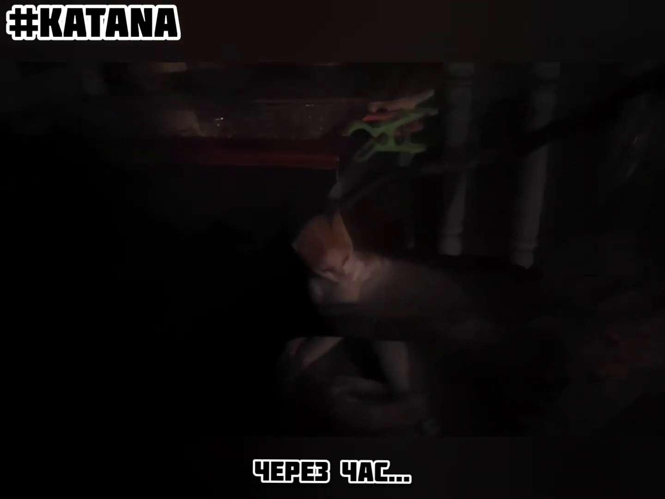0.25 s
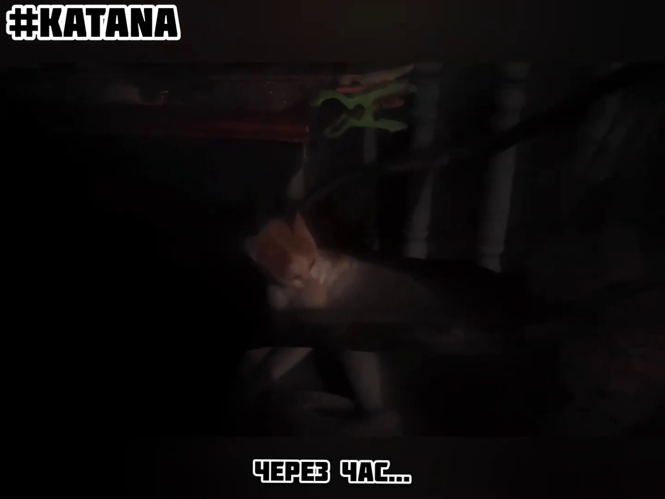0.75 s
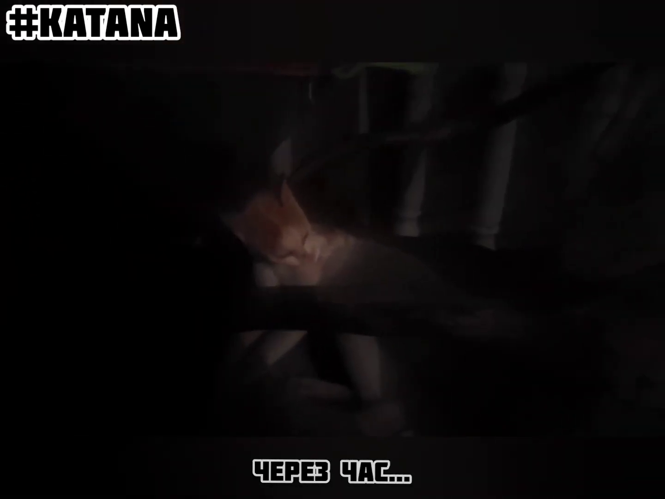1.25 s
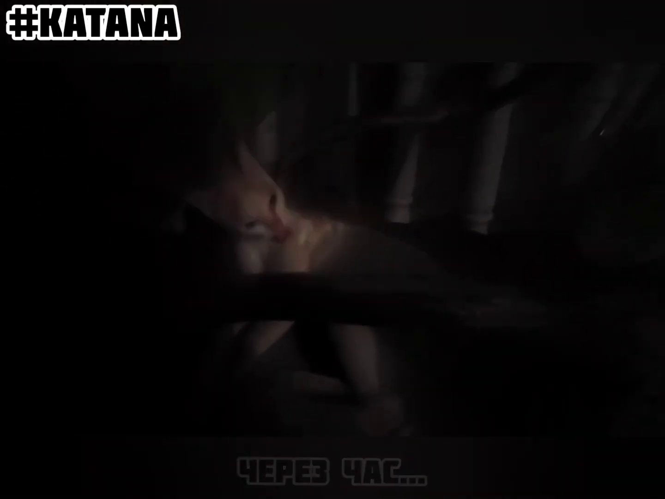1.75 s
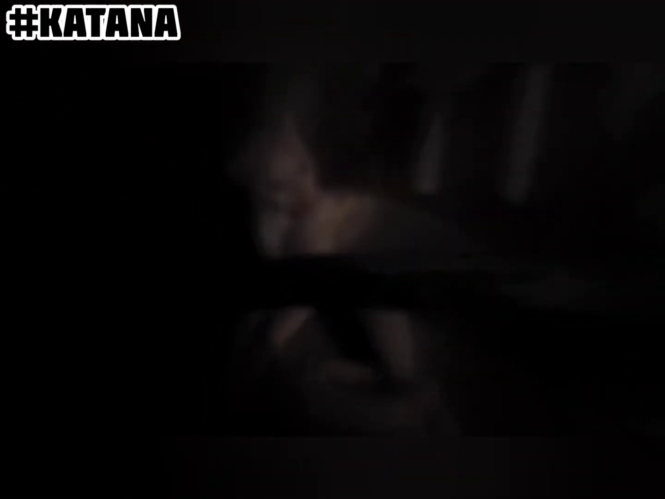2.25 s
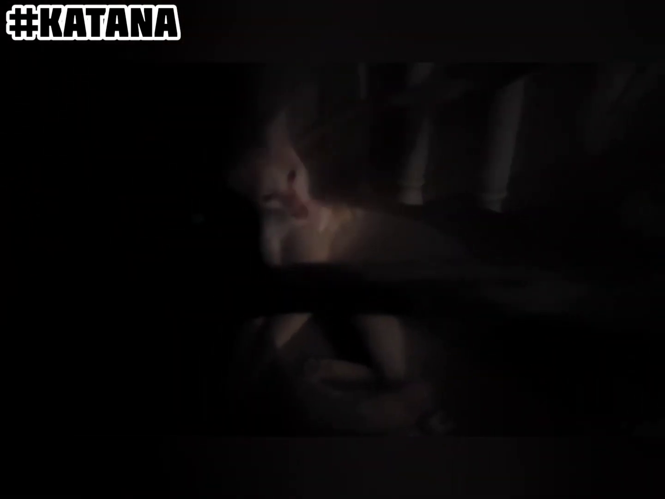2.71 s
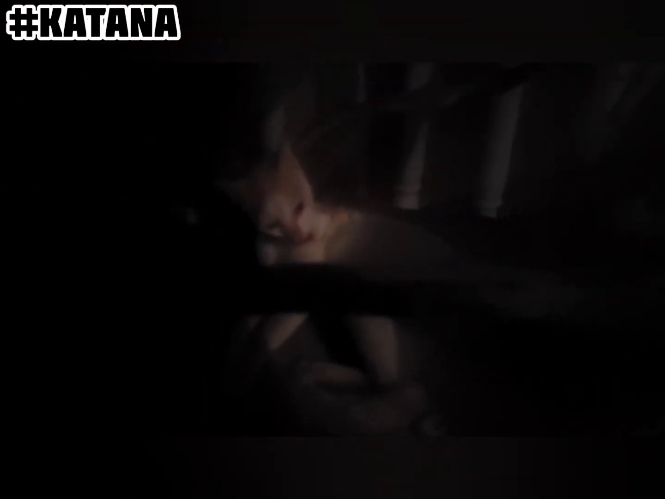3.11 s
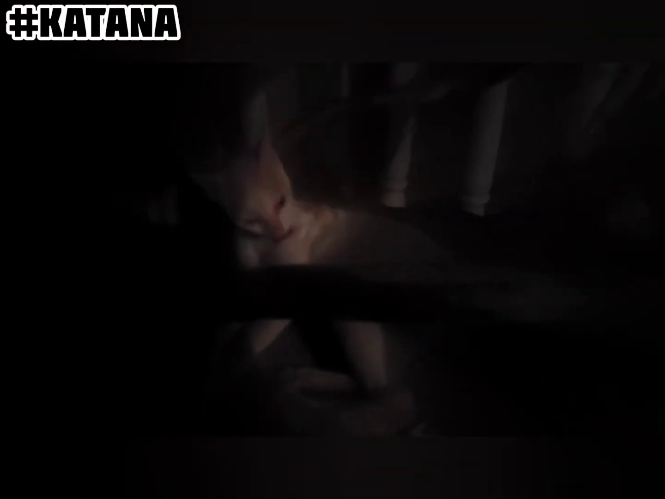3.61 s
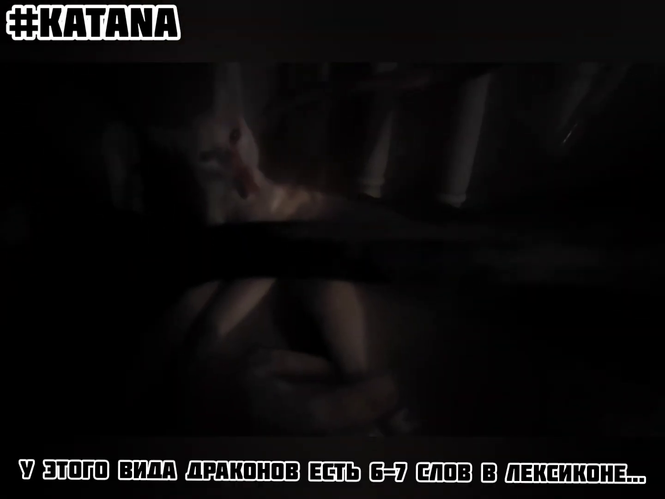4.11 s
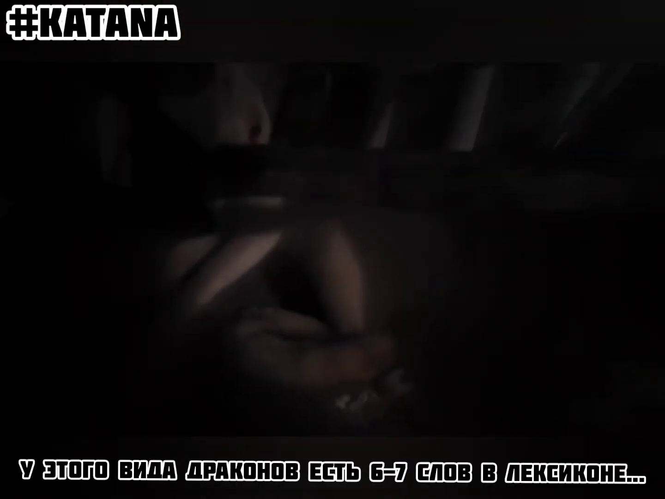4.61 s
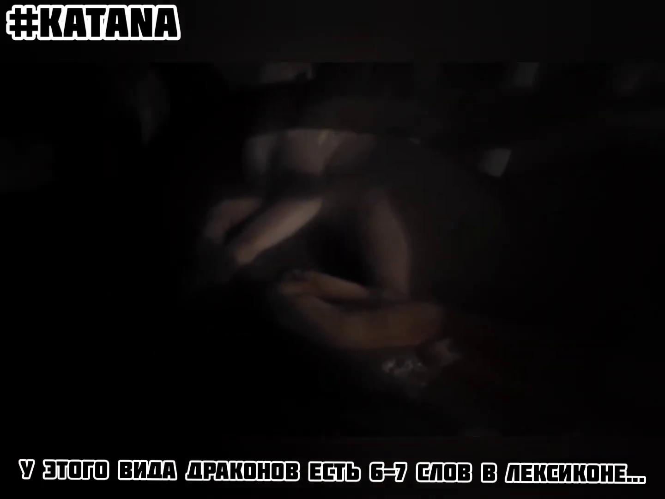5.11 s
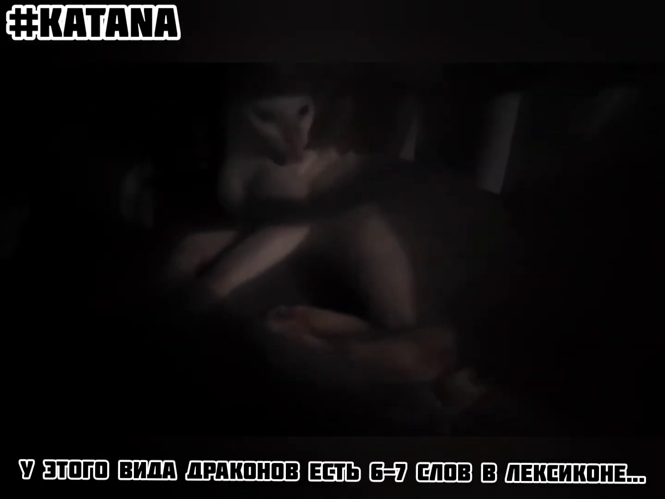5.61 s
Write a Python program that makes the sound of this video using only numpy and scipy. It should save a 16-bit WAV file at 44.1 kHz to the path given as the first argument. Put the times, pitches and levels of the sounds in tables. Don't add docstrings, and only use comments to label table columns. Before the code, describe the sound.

A continuous summer night chorus lasts about six seconds, with no clear beginning or end. Far crickets and katydids blend into shrill, shimmering bands, different in each ear, swelling in waves roughly every half second. Beneath lie quieter, lower insect bands and a soft rumble of air and distant traffic. A tiny scuff opens the scene. A near cricket trills in seven-stroke phrases at about 0.15, 1.2, 2.5, 3.6 and 4.9 seconds; the fourth is weakest, the last loudest and slightly right. Two katydids on the left alternate dry, hissing rasps throughout, and a shy cricket swells softly there near 0.7, 2.6, 4.2 and 5 seconds. At 4.14 seconds a very short, hard tap hits the right microphone, bright and clipped with a tiny thud. Faint brushes follow around 5 seconds, and the highest haze flares left near 5.35. The recording is open, dry and slightly grainy.

```python
import sys
import numpy as np
from scipy import signal
from scipy.io import wavfile
from scipy.ndimage import uniform_filter1d

SR = 44100
rng = np.random.default_rng(int(sys.argv[2]) if len(sys.argv) > 2 else 0)


def attenuation_scalar(level_db):
    decades = np.asarray(level_db, float) / 20
    return 10 ** decades


def int16_out(signal):
    q = np.round(np.clip(np.atleast_2d(signal).T, -1, 1) * 32767)
    wavfile.write(sys.argv[1], SR, q.astype(np.int16))


N = 258205


def rms_one(x):
    return x / np.sqrt(np.mean(x ** 2, axis=-1, keepdims=True) + 1e-20)


def at_hz(points, hz):
    points_hz, values = np.transpose(points)
    return np.interp(np.log(hz), np.log(points_hz), values)


def drift(rate_hz):
    r = np.exp(-80 * np.pi * rate_hz / SR)
    slow = signal.lfilter([1], [1, -2 * r, r * r], rng.standard_normal(N // 40 + 2002))[2000:]
    return np.interp(np.arange(N) / 40, np.arange(len(slow)), rms_one(slow))


def swells(events):
    t = np.arange(N) / SR
    return sum(attenuation_scalar(level_db) * np.exp(-((t - middle) / length) ** 2) for middle, length, level_db in events)


def resonance(x, hz, width_hz):
    r = np.exp(-np.pi * width_hz / SR)
    section = [(1 - r * r) / 2, 0, (r * r - 1) / 2, 1, -2 * r * np.cos(2 * np.pi * hz / SR), r * r]
    return signal.sosfilt([section, section], x)


def singers(wings, strikes_per_s, flutter_db):
    out = 0
    for hz, width_hz, level_db in wings:
        strikes = (rng.random(N) < strikes_per_s / SR) * rng.standard_normal(N)
        flutter = attenuation_scalar(level_db + flutter_db * drift(18.6))
        out = out + flutter * resonance(strikes, hz, width_hz)
    return rms_one(out)


def both_sides(wings, alike, **how):
    shared, apart = singers(wings, **how), singers(wings, **how)
    return (np.sqrt(1 + alike) * shared + np.sqrt(1 - alike) * apart * [[1], [-1]]) / np.sqrt(2)


def loudness(chorus):
    # crest_s, left_rise_db, right_rise_db
    wave_crests = [(.42, 5, 4.5), (1.08, 2.3, 1), (1.4, 1.2, 1.1), (2.1, 5, 5), (2.84, 4.5, 6),
                   (3.4, 3.5, 2), (3.72, 0.5, 3.5), (4.44, 5, 4.5), (4.85, 1.3, 2), (5.33, 6, 3.5),
                   (5.88, 6.5, 2)]
    # time_s, left_db, right_db
    facing = [(0, 1, -1), (1, 0.8, 0.2), (2, -0.2, 0), (3, 0.1, -0.5), (4.05, -0.5, 0.45), (4.3, 0.3, 1.5),
              (4.9, -0.6, 1.7), (5.4, 0.5, .6), (5.85, 1.5, 1)]
    choruses = {"lower": [(-42.5, 1.2, 0.22), (-28.5, 0.43, 0.35)], "upper": [(-34.5, .95, 0.44),
                (-32, 1.19, 0.52)], "deep": [(-32.5, 0.02, 2.1), (-35.5, 0.054, 0.5)],
                "middle": [(-42, .05, -.2), (-42, .05, 0.93)], "thin": [(-49, -.1, .1), (-46, -0.024, 1.8)],
                "haze": [(-58, -0.063, -0.094), (-58.5, -0.7, 0.23)], "edge": [(-43, 0.038, .2),
                (-46.5, .05, 0.22)]}
    t = np.arange(0, N + 64, 64) / SR
    waves = 0
    for crest, left_db, right_db in wave_crests:
        span_s = np.where(t < crest, .2, .24)
        waves = waves + np.outer([left_db, right_db], np.exp(-((t - crest) / span_s) ** 2))
    s, *sides = np.transpose(facing)
    facing_db = np.array([np.interp(t, s, side) for side in sides])
    level_db, by_waves, by_facing = np.transpose(choruses[chorus])[:, :, None]
    gain = attenuation_scalar(level_db + by_waves * waves + by_facing * facing_db)
    return np.repeat(gain, 64, axis=1)[:, :N]


def night_air():
    # pitch_hz, level_db (per Hz)
    air_spectrum = [(13, -31), (22, 3), (65, -7.5), (96, -3.5), (130, -8.5), (167, 2), (226, -2.5),
                    (424, -6), (517, -7.5), (618, -13), (986, -13.5), (1340, -22), (1600, -30.5),
                    (2080, -60), (3520, -120)]
    # pitch_hz, likeness (1 = same)
    ear_likeness = [(60, 0.44), (120, 0.74), (250, 0.8), (500, 0.59), (1030, 0.066), (2090, 0.33),
                    (4250, 0), (8640, -0.0)]
    out = 0
    edges = 20 * 2 ** np.arange(0, 8.1, .5)
    white = rng.standard_normal((2, 2, N))
    for k, (low, high) in enumerate(zip(edges, edges[1:])):
        band = signal.butter(2, [low, high], "band", fs=SR, output="sos")
        mid, side = signal.sosfilt(band, white[k % 2])
        hz = np.sqrt(low * high)
        alike = np.clip(at_hz(ear_likeness, hz), -1, 1)
        steeper_db = -14 * max(np.log2(hz / 1600), 0)
        gain = attenuation_scalar(at_hz(air_spectrum[1:-1], hz) + steeper_db + 2.1 * drift(7.2))
        out = out + gain * (np.sqrt(1 + alike) * mid + np.sqrt(1 - alike) * side * [[1], [-1]])
    return attenuation_scalar(-39.96) * rms_one(out) * attenuation_scalar(np.array([[1.4], [-1.4]]))


def rustles():
    # middle_s, length_s, level_db
    stirrings = [
        (0.02, 0.015, -37.5),
        (2.623, 0.22, -60.5),
        (4.234, 0.041, -70.5),
        (4.897, 0.038, -59),
        (4.969, 0.032, -51.5),
        (5.208, .015, -54),
    ]
    dulled = signal.lfilter([1], [1, -.75], rng.standard_normal((2, N)))
    no_bass = signal.butter(2, 350, "high", fs=SR, output="sos")
    return swells(stirrings) * rms_one(signal.sosfilt(no_bass, dulled))


def steady_chorus():
    # pitch_hz, width_hz, level_db
    deep_wings = [(1939, 150, -3), (2072.5, 240, -2.5), (2440, 160, -23.5)]
    middle_wings = [(3698, 560, -4.5), (3976, 450, -2.5), (4233, 300, -7.5)]
    thin_wings = [(5393, 130, -11), (6030, 420, -2), (6310, 310, -6)]
    deep = loudness("deep") * both_sides(deep_wings, 0.24, strikes_per_s=6000, flutter_db=1.5)
    middle = loudness("middle") * both_sides(middle_wings, 0.13, strikes_per_s=7100, flutter_db=1.82)
    thin = loudness("thin") * both_sides(thin_wings, 0.011, strikes_per_s=13000, flutter_db=3.0)
    return deep + middle + thin


def shrill_chorus():
    # pitch_hz, width_hz, level_db
    lower_wings = [
        [(6900, 600, -8), (7430, 660, -6), (7680, 430, .5)],
        [(6960, 580, -5.5), (7376, 420, 3.5), (7572, 400, 1.5)],
    ]
    upper_wings = [
        [(7680, 420, -7), (7974, 360, 0), (8210, 300, -2.5)],
        [(7970, 450, 4), (8150, 350, -2.5)],
    ]
    # pitch_hz, width_hz, level_db
    edge_wings = [(8600, 330, -1.5), (9000, 360, -3.5)]
    lower = loudness("lower") * [singers(w, 9000, flutter_db=1.5) for w in lower_wings]
    upper = loudness("upper") * [singers(w, 9000, flutter_db=1.5) for w in upper_wings]
    period_s, crest_s, throb_db = .915, .68, 3
    throb = attenuation_scalar(throb_db * np.cos(2 * np.pi * (np.arange(N) / SR - crest_s) / period_s))
    edge = loudness("edge") * [singers(edge_wings, 9000, flutter_db=1.8) for ear in range(2)]
    return lower + upper + throb * edge


def shy_cricket():
    # middle_s, length_s, level_db
    songs = [
        (0.703, .14, -57.5),
        (2.606, 0.069, -49.5),
        (4.215, 0.11, -53),
        (4.99, 0.15, -52.5),
    ]
    # pitch_hz, width_hz, level_db
    shy_wings = [(4620, 400, -2.5), (4880, 400, -7.5)]
    return swells(songs) * singers(shy_wings, 6000, flutter_db=1.0) * attenuation_scalar(np.array([[1.5], [-2.5]]))


def katydids():
    # middle_s, length_s,
    # level_db
    near_rasp = [(.13, 0.18, -41), (.778, .13, -42.5), (1.465, 0.15, -45), (2.099, 0.15, -44),
                 (2.896, 0.18, -43.5), (3.55, .24, -43.5), (4.186, 0.15, -41), (4.844, 0.21, -41),
                 (5.677, 0.24, -41.5)]
    far_rasp = [(.275, .1, -49), (1.012, 0.093, -47), (1.842, 0.37, -51), (2.529, 0.16, -50.5),
                (3.26, 0.087, -51.5), (3.958, 0.099, -46.5), (4.68, 0.1, -44), (5.2, 0.061, -52),
                (5.434, 0.037, -44)]
    # pitch_hz, width_hz, level_db
    rasp_wings = [(9650, 420, 6), (10300, 1900, 0), (11680, 300, -5)]
    haze_wings = [(12290, 1100, 2.5), (13440, 1800, -8), (14360, 1500, -6.5)]
    t = np.arange(0, N + 64, 64) / SR
    at_ears = attenuation_scalar(np.array([[0], [-4.5]]))
    bursts = attenuation_scalar(-73.5)
    for middle, length, level_db in near_rasp + far_rasp:
        shape = np.exp(-np.abs((t - middle) / (0.46 * length)) ** 3)
        bursts = bursts + attenuation_scalar(level_db) * at_ears * shape
    bursts = np.repeat(bursts, 64, axis=1)[:, :N]
    rasp = bursts * both_sides(rasp_wings, 0.073, strikes_per_s=7400, flutter_db=4.5)
    crest_s, wide_s, rise_db = 5.35, 0.28, 6.5
    flare = attenuation_scalar(np.outer([rise_db, 0], np.exp(-((np.arange(N) / SR - crest_s) / wide_s) ** 2)))
    haze = both_sides(haze_wings, 0.067, strikes_per_s=2400, flutter_db=1.5)
    return rasp + flare * loudness("haze") * haze


def near_cricket():
    # first_stroke_s, peak_db, loudest_stroke, left_minus_right_db
    phrases = [
        (.152, -41.5, 1.1, 0.7),
        (1.195, -40, .7, 0.2),
        (2.511, -42.5, 0.69, 3),
        (3.628, -45, 0.17, -0.5),
        (4.885, -38, 1.1, -1.5),
    ]
    trill_hz, stroke_s, gap_s = 3132, 0.053, .063
    out = np.zeros((2, N))
    t = np.arange(round(stroke_s * SR)) / SR
    swell = np.sin(np.pi * (t / stroke_s) ** 1.7) ** 0.62
    chances = rng.standard_normal((len(phrases), 7, 4))
    for (first, peak_db, loudest, pan_db), chance in zip(phrases, chances):
        for k, (sag, detune, late, turn) in enumerate(chance):
            pitch_hz = trill_hz * (1 + .003 * detune + (.06 + .01 * sag) * np.exp(-t / 0.022))
            note = swell * np.sin(2 * np.pi * np.cumsum(pitch_hz) / SR)
            ears_db = np.array([[.5], [-.5]]) * (pan_db + 3.1 * turn)
            level_db = peak_db - (k - loudest) ** 2 + ears_db
            start = round((first + k * gap_s + .003 * late) * SR)
            out[:, start:start + len(t)] += attenuation_scalar(level_db) * note
    out = out * (1 + .38 * drift(90))
    fade = np.exp(-np.log(1000) * np.arange(SR // 3) / SR / 0.16)
    leaves = fade * rng.standard_normal((2, len(fade)))
    return out + attenuation_scalar(-22) * signal.fftconvolve(out, leaves, axes=1)[:, :N]


def tap():
    # start_s, level_db, pitch_hz, t60_s
    contacts = [
        (4.1347, -9, 7000, .006),
        (4.1351, -6, 6300, .005),
        (4.1362, 7, 6900, .004),
        (4.1369, 4.5, 2450, .004),
        (4.1374, 5, 7600, .003),
        (4.1382, -12, 7200, .003),
        (4.1400, -19, 900, .006),
    ]
    tap_s = 4.1370
    start = round((tap_s - .01) * SR)
    t = (start + np.arange(SR // 5)) / SR
    mesh = np.zeros(len(t))
    for s, level_db, hz, t60 in contacts:
        age = np.maximum(t - s, 0)
        onset = 1 - np.exp(-age / 0.00005)
        mesh += attenuation_scalar(level_db - 60 * age / t60) * np.sin(2 * np.pi * hz * age) * onset
    age = np.maximum(t - tap_s, 0)
    turns = 165 * age + 2.3 * (1 - np.exp(-age / .00112))
    swing = attenuation_scalar(4) * np.exp(-age / .0016) + attenuation_scalar(-14) * np.exp(-age / .012)
    membrane = -swing * np.sin(2 * np.pi * turns)
    body = attenuation_scalar(-20.0) * np.exp(-age / 0.0087) * np.sin(2 * np.pi * 75 * age)
    right = np.pad(mesh + membrane + body, (start, N - start - len(t)))
    return right * [[0], [1]]


def scene():
    background = night_air() + rustles() + steady_chorus() + shrill_chorus()
    return background + shy_cricket() + katydids() + near_cricket() + tap()


def coarse_grain(x, comb_db, patchy_db):
    # pitch_hz, usual_level_over_step_db
    coarseness = [(200, 18), (800, 5), (1200, -2), (1600, -3), (2050, 6), (2700, -9), (3000, -10),
                  (3350, -4), (3950, 1), (4600, -8), (5050, -14), (5600, -3), (6300, 4), (7800, 20),
                  (8800, -4), (9700, -16.5), (11200, -13), (12300, -9), (14200, -9), (15000, -11.5)]
    hop, lines = 1024, 704
    hz = (np.arange(lines) + .5) * SR / (2 * hop)
    basis = np.cos(np.pi / hop * np.outer(np.arange(2 * hop) + .5 + hop / 2, np.arange(lines) + .5))
    basis *= signal.windows.kaiser_bessel_derived(2 * hop, 4 * np.pi)[:, None] * np.sqrt(2 / hop)
    lead = 2 * hop - 291
    padded = np.pad(x, [(0, 0), (lead, 3 * hop)])
    index = np.arange(padded.shape[1] // hop - 1)[:, None] * hop + np.arange(2 * hop)
    c = np.array([ear[index] @ basis for ear in padded])
    typical = np.median(np.abs(c), axis=1, keepdims=True).mean(0)
    usual = uniform_filter1d(1.5 * typical, size=12)
    chance = rng.standard_normal((c.shape[1], lines // 16))
    patches = np.repeat(1.7 * uniform_filter1d(chance, size=3, axis=0), 16, axis=1)
    louder = np.maximum(uniform_filter1d(1.25 * np.abs(c), size=16) / usual, 1) ** .5
    step = usual * louder * attenuation_scalar(patchy_db * patches - at_hz(coarseness, hz))
    comb = np.cos(2 * np.pi * (hz - 10108) / (SR / 128)) - .5
    depth = np.interp(hz, [8600, 9900, 11500, 12200, 13000], [0, 1.15, 1.15, 0, -.35])
    c *= attenuation_scalar(comb_db * comb * depth)
    rounded = np.sign(c) * step * np.floor(np.abs(c) / step + .4)
    frames = np.array([ear @ basis.T for ear in rounded])
    out = np.zeros_like(padded)
    for half in (slice(0, hop), slice(hop, None)):
        out[:, index[:, half]] += frames[:, :, half]
    return out[:, lead:lead + N]


def top_cut(x):
    return signal.sosfilt(signal.butter(12, 15150, fs=SR, output="sos"), x)


def record(dry):
    overloaded = np.clip(dry, -1.1, 1.1)
    mix = coarse_grain(overloaded, comb_db=6, patchy_db=3.5)
    return top_cut(mix)


dry = scene()
out = record(dry)
int16_out(out)
```